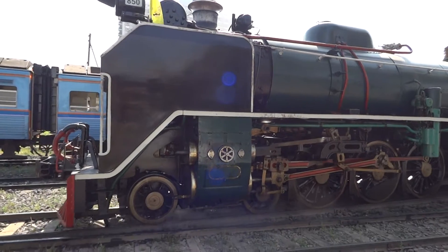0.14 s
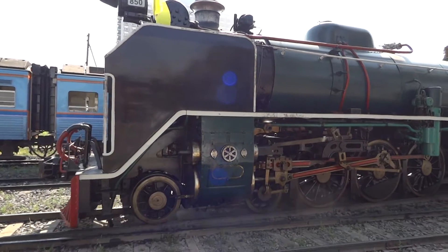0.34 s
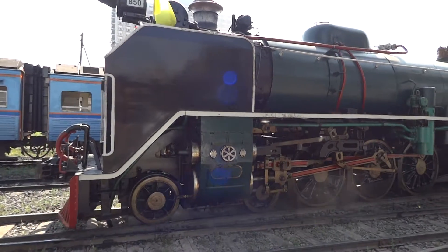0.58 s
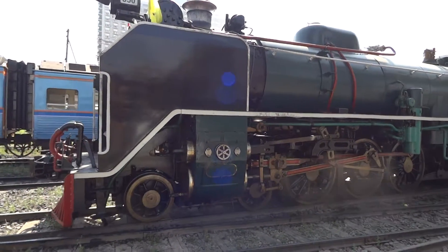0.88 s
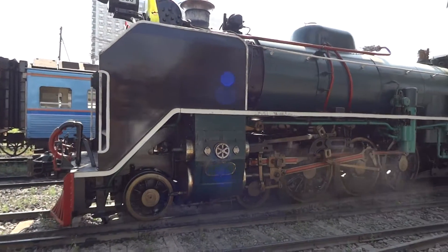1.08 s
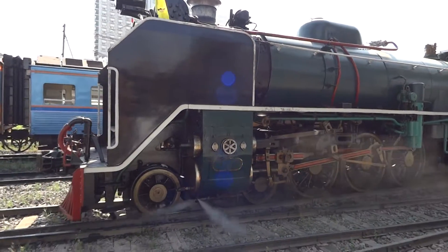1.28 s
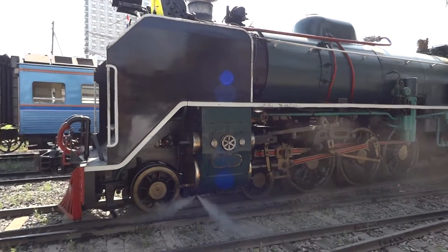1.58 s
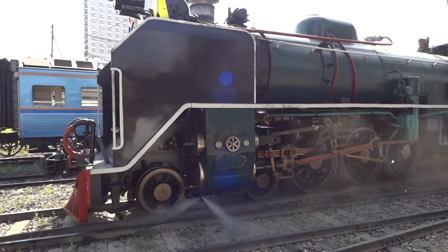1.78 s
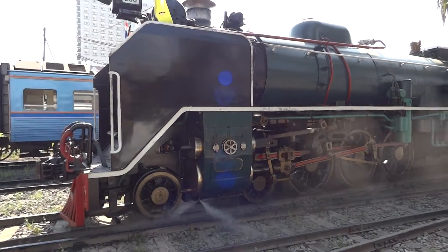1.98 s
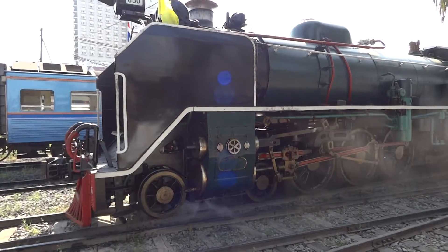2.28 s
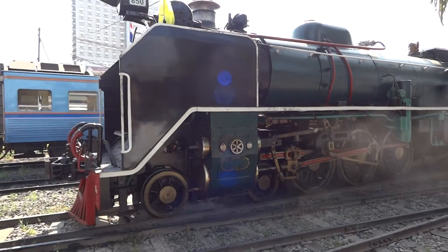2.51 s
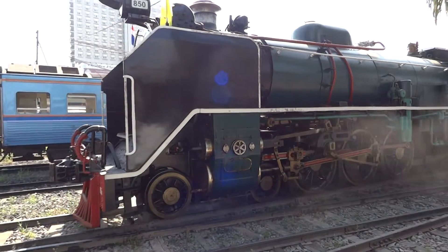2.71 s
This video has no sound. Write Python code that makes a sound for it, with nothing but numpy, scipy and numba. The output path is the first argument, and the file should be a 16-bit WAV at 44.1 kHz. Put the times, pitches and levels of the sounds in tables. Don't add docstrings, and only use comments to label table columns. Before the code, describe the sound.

A locomotive's pressurised steam jet, already blowing, sprays a dense bright hiss; after about a second it turns wetter, and a very high airy whistle strengthens and climbs. Close outdoor pickup, narrow stereo, short reflections.

```python
import sys
import numpy as np
from scipy import signal
from scipy.fft import rfft, irfft
from scipy.io import wavfile
from scipy.ndimage import map_coordinates
from numba import njit

SR = 44100
rng = np.random.default_rng(int(sys.argv[2]) if len(sys.argv) > 2 else 0)


def volts_from_decibels(level):
    exponent = np.asarray(level, float) / 20
    return 10 ** exponent


def file_out(sig):
    cols = np.atleast_2d(sig).T
    lim = np.clip(cols, -1, 1)
    pcm = np.round(lim * 32767).astype(np.int16)
    wavfile.write(sys.argv[1], SR, pcm)


N = 125685
T = np.arange(N) / SR

# (time [s], level [dB])
THIN_FLOW = [
    (0, -22),
    (.04, -18),
    (.35, -16.5),
    (.6, -17),
    (1.12, -18.5),
    (1.2, -23),
    (1.9, -22),
    (2.3, -21.5),
    (2.85, -19),
]
# (frequency [Hz], level [dB per Hz])
THIN_COLOUR = [(900, -31.5), (1500, -17), (2600, -16.5), (3050, -8.5), (4600, -3.5), (7800, -1.5),
               (13500, 0), (16000, -6)]
# (frequency [Hz], width [Hz], level [dB], fade [dB per s], climb [Hz per s])
PIPES = [(3056, 180, -38, 4, 50), (4604, 480, -28, 11.5, 100), (6020, 380, -30, 13, -49.5),
         (8850, 480, -32.5, 0, 150), (11220, 400, -33.5, 3.5, 299.5), (12270, 510, -29, 3.5, 700)]
# (time [s], level [dB])
WIDE_FLOW = [
    (0, -20.5),
    (.5, -22.5),
    (1.0, -20.5),
    (1.25, -18),
    (1.75, -18),
    (1.95, -21),
    (2.2, -22),
    (2.4, -20.5),
    (2.85, -23),
]
# (frequency [Hz], level [dB per Hz])
WIDE_COLOUR = [(500, -27.5), (700, -16), (2100, -12), (3100, -2.5), (4300, -1.5), (9000, 0), (12500, -4),
               (16000, -10)]
# (frequency [Hz], width [Hz], level against the flow [dB])
FITTINGS = [(1055, 12, -35.5), (1328, 41, -37), (5870, 220, -26)]
# (time [s], level [dB], centre [Hz], width [Hz])
WHISTLE = [(0, -30, 9520, 500), (.3, -35, 9750, 500), (.6, -20, 10030, 450), (.9, -21.5, 10360, 450),
           (1.2, -20, 10070, 450), (1.6, -19.5, 9800, 399), (1.8, -18, 9960, 400), (2.0, -14.5, 10300, 402),
           (2.25, -16, 10610, 510), (2.55, -16.5, 11020, 770), (2.85, -18, 11060, 650)]
# (frequency [Hz], level [dB rms])
HUM = [(50, -49.5), (100, -57.5)]
# (frequency [Hz], level [dB per Hz])
YARD_COLOUR = [(70, -13), (100, -11.5), (172, -6), (325, -8), (495, -13), (700, -11)]
# (delay [ms], level [dB])
ECHOES = [(1.88, -16), (4.9, -18), (7.9, -20)]
# (frequency [Hz], side level against middle [dB])
SPREAD = [(50, -17), (150, -24), (400, -14.5), (800, -17.5), (2000, -33), (5000, -29), (10000, -21.5),
          (15000, -38)]


def rms_one(x):
    return x / np.sqrt(np.mean(np.abs(x) ** 2) + 1e-20)


def in_time(rows):
    s, *columns = np.transpose(rows)
    return [np.interp(T, s, c) for c in columns]


def at_hz(points, hz):
    table_hz, db = np.transpose(points)
    return np.interp(np.log(hz), np.log(table_hz), db)


def drift(rate):
    every = 40
    pole = np.exp(-2 * every * np.pi * rate / SR)
    white = rng.standard_normal(N // every + 2002)
    slow = signal.lfilter([1], [1, -2 * pole, pole * pole], white)[2000:]
    return np.interp(np.arange(N) / every, np.arange(len(slow)), rms_one(slow - slow.mean()))


def turbulence(spectrum, slow_db, fast_db, rate, count):
    hz = np.maximum(np.fft.rfftfreq(N, 1 / SR), 1)
    low, high = spectrum[0][0], spectrum[-1][0]
    edges = np.minimum(hz / low, 1) ** 2 * np.minimum(high / hz, 1) ** 2
    colour = volts_from_decibels(at_hz(spectrum, hz)) * edges
    middle_and_side = [np.ones_like(hz), volts_from_decibels(at_hz(SPREAD, hz))]
    white = rfft(rng.standard_normal((2, N))) * colour * middle_and_side
    place = np.clip(np.log(hz / low) / np.log(high / low), 0, 1) * (count - 1)
    together, out = drift(rate), 0
    for k in range(count):
        share = np.cos(np.pi / 2 * np.clip(np.abs(place - k), 0, 1)) ** 2
        unsettled = np.array([np.ones(N), volts_from_decibels(4.5 * drift(7.7))])
        swell_db = slow_db * drift(1.4)
        flicker_db = fast_db * (0.63 * together + 0.7 * drift(rate))
        out = out + irfft(white * share, N) * unsettled * volts_from_decibels(swell_db + flicker_db)
    out = out / np.sqrt(np.mean(out[0] ** 2))
    return out[0] + out[1] * [[1], [-1]]


@njit
def glide(x, r):
    out, a, b = np.empty_like(x), x[0] * 0, x[0] * 0
    for i in range(len(x)):
        a = r[i] * a + (1 - r[i]) * x[i]
        b = r[i] * b + (1 - r[i]) * a
        out[i] = b * 2 / np.sqrt(1 - r[i])
    return out


def resonance(hz, width_hz):
    r = np.exp(-np.pi * 1.55 * np.clip(width_hz, 5, 6000) / SR) * np.ones(N)
    turn = np.exp(2j * np.pi * np.cumsum(hz * np.ones(N)) / SR)
    noise = rng.standard_normal((2, 2, N))
    mid, side = [rms_one((glide(re + 1j * im, r) * turn).real) for re, im in noise]
    return mid + volts_from_decibels(at_hz(SPREAD, np.mean(hz))) * side * [[1], [-1]]


def thin_jet():
    flow_db, = in_time(THIN_FLOW)
    hiss = turbulence(THIN_COLOUR, slow_db=0.0, fast_db=1.05, rate=23.0, count=10)
    pipes = 0
    for hz, width, db, fade, climb in PIPES:
        pipes = pipes + volts_from_decibels(db - fade * T) * resonance(hz + climb * T, width)
    return volts_from_decibels(flow_db) * (hiss + volts_from_decibels(20) * pipes)


def wide_jet():
    flow_db, = in_time(WIDE_FLOW)
    hiss = turbulence(WIDE_COLOUR, slow_db=0.17, fast_db=0.94, rate=16.6, count=14)
    tones = sum(volts_from_decibels(db) * resonance(hz, width) for hz, width, db in FITTINGS)
    return volts_from_decibels(flow_db) * (tones + hiss)


def whistle():
    db, hz, width = in_time(WHISTLE)
    hz = hz + 50 * drift(15)
    core = resonance(hz, width) * volts_from_decibels(0.57 * drift(8.6))
    skirt = volts_from_decibels(-4) * resonance(hz + 650, 1370)
    tone = volts_from_decibels(db - 2.5) * (core + skirt)
    plate_ms = 2.1 + 0.028 * drift(0.41)
    late = np.arange(N) - plate_ms * SR / 1000
    echo = [map_coordinates(side, [late], order=5, mode="wrap") for side in tone]
    return tone + volts_from_decibels(-12) * np.array(echo)


def yard():
    flow_db, = in_time(WIDE_FLOW)
    hum = 0
    for hz, db in HUM:
        hum = hum + volts_from_decibels(db + 0.49 * drift(3)) * np.sqrt(2) * np.sin(2 * np.pi * hz * T)
    drone_db = -53.5 + 4 * np.clip((T - 1.13) / 0.05, 0, 1)
    drone = volts_from_decibels(drone_db) * resonance(172, 44)
    rumble_db = -49.5 + flow_db - flow_db.mean()
    rumble = volts_from_decibels(rumble_db) * turbulence(YARD_COLOUR, slow_db=0.8, fast_db=1.0, rate=4.4, count=6)
    return hum + drone + rumble


def echoes(x):
    hz = np.fft.rfftfreq(N, 1 / SR)
    back = sum(volts_from_decibels(db) * np.exp(-2j * np.pi * hz * ms / 1000) for ms, db in ECHOES)
    return irfft(rfft(x) * (1 - back / np.hypot(1, hz / 8000)), N)


def late_leak():
    starts_s, rise_s = 2.06, 0.25
    opening = np.clip((T - starts_s) / rise_s, 0, 1)
    return volts_from_decibels(-30.5) * opening * resonance(8260, 640)


def scene():
    steam = thin_jet() + wide_jet() + whistle() + late_leak()
    return echoes(steam) + yard()


def roll_off(x):
    return signal.sosfilt(signal.butter(12, 15750, fs=SR, output="sos"), x)


def record(dry):
    mix = 0.95 * np.tanh(dry / 0.95)
    return roll_off(mix)


dry = scene()
out = record(dry)
file_out(out)
```